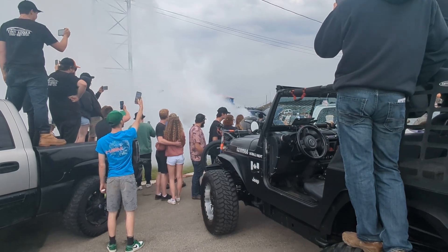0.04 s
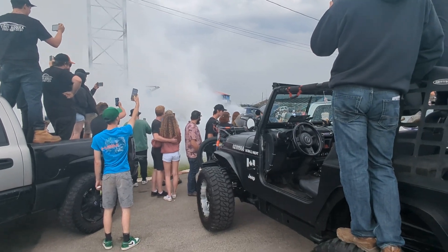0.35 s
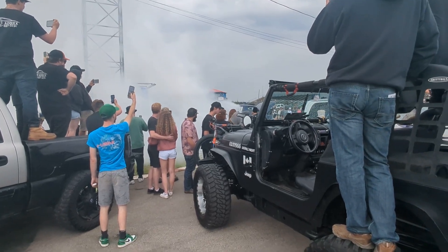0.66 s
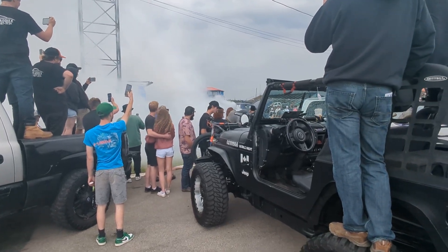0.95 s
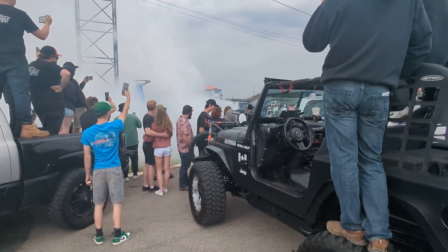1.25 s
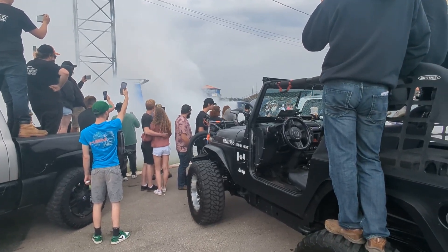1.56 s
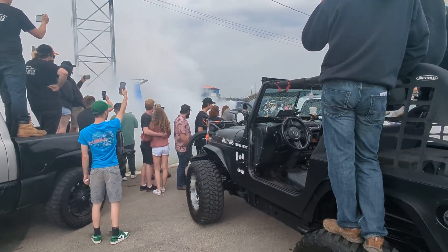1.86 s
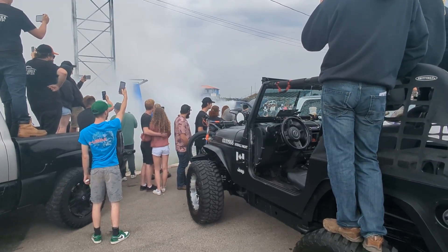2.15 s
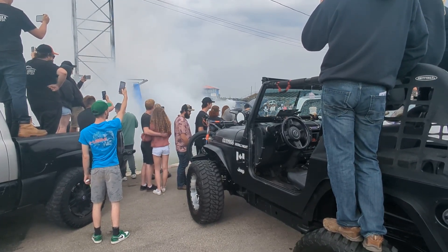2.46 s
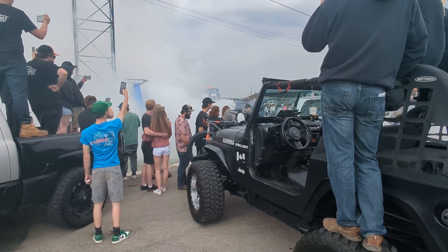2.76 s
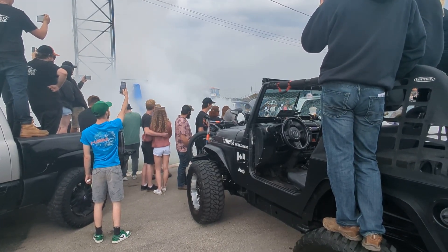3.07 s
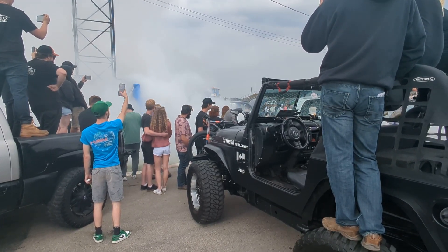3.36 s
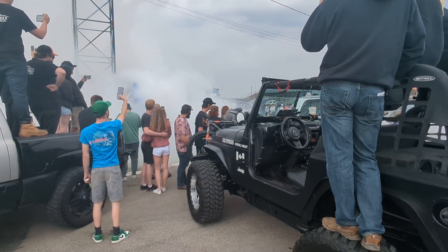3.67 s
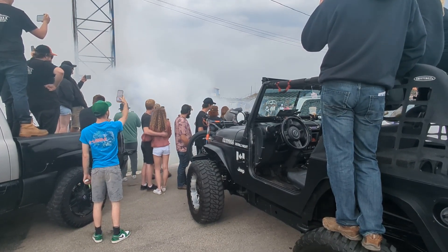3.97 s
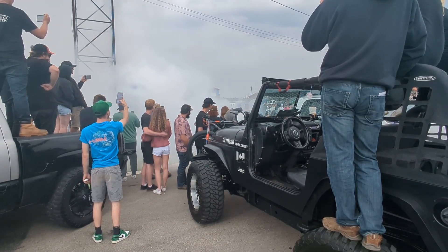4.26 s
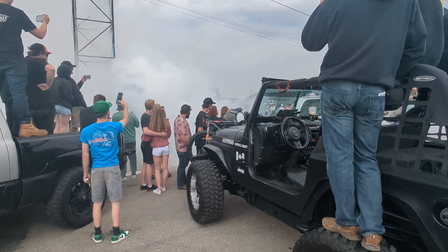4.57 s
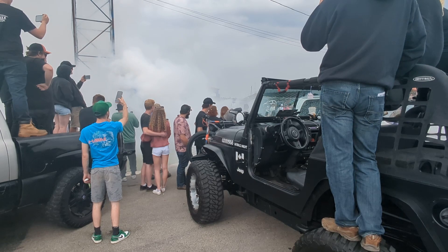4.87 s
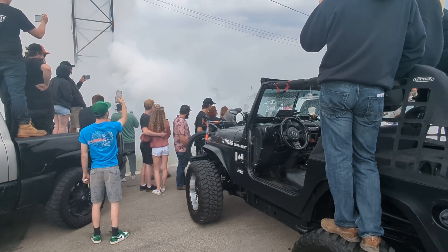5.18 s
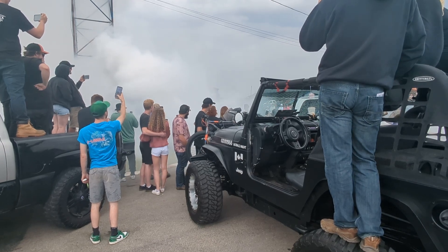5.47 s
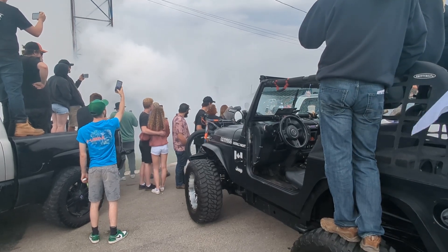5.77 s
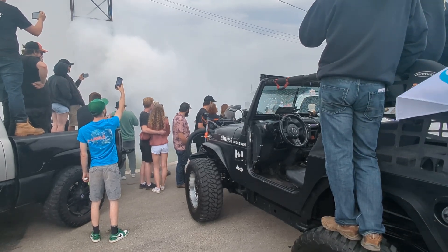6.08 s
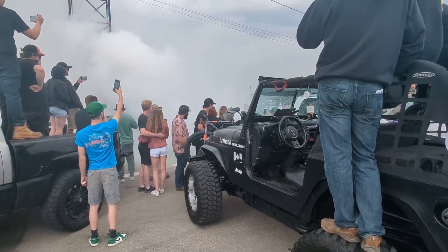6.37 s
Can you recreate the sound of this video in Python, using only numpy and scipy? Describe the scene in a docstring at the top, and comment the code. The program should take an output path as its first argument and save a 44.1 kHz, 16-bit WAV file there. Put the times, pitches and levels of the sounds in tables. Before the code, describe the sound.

A V8 pickup holds a burnout, its engine revving in steady pulses over roaring tyres, with a brief flag snap near the end.

```python
"""Behind a crowd, among parked cars, a V8 pickup holds a burnout near 4200 rpm, the throttle pumped
about twice a second. One cylinder bank dominates the exhaust, so its uneven pulses boom and growl,
and gas rasps at each firing. The spinning tyres roar, spit grit and squeal faintly once.
Late on, a flag rustles, snaps and flutters near the phone, whose right microphone is muffled."""
import sys
import numpy as np
from scipy import signal
from scipy.fft import rfft, irfft, next_fast_len
from scipy.io import wavfile
from scipy.ndimage import uniform_filter1d, minimum_filter1d

SR = 44100
rng = np.random.default_rng(int(sys.argv[2]) if len(sys.argv) > 2 else 0)


def log_audio(samples):
    """Write samples as a 16-bit WAV file to the path given in sys.argv[1]."""
    # one column per channel
    frames = np.atleast_2d(samples).T
    # limit to full scale, then quantise
    limited = np.clip(frames, -1, 1)
    pcm = np.round(limited * 32767).astype(np.int16)
    wavfile.write(sys.argv[1], SR, pcm)


N = 283386
TIME = np.arange(N) / SR

# punch of each cylinder at the nearer tailpipe, in firing order: (level [dB])
CYLINDERS = [0, -10, -10, -2, -10, -2, 0, -10]


def undb(db):
    """Decibels to gain."""
    return 10 ** (np.asarray(db) / 20)


def curve(points, at=TIME):
    """Read a breakpoint curve, by default along the timeline."""
    return np.interp(at, *np.transpose(points))


def colour(x, spectrum):
    """EQ by an outline of (frequency [Hz], gain [dB])."""
    size = next_fast_len(N + 4096)
    f = np.maximum(np.fft.rfftfreq(size, 1 / SR), 1)
    hz, db = np.transpose(spectrum)
    gain = undb(np.interp(np.log(f), np.log(hz), db))
    return irfft(rfft(x, size) * gain, size)[..., :N]


def band(x, spectrum):
    """EQ with steep skirts past both ends, scaled to an rms of 1."""
    (low, low_db), (high, high_db) = spectrum[0], spectrum[-1]
    shaped = colour(x, [(low / 2, low_db - 40), *spectrum, (high * 2, high_db - 40)])
    return shaped / np.sqrt(np.mean(shaped ** 2))


def walk(rate):
    """Smooth random drift with a spread near 1, changing rate times a second."""
    steps = signal.resample(rng.standard_normal(4096), 4 * 4096)
    return np.interp(TIME * rate * 4, np.arange(len(steps)), steps)


def ease(x, seconds):
    """Round the corners of a control."""
    return uniform_filter1d(x, size=max(1, int(seconds * SR)), mode="nearest")


def throttle(open_s=0.099, close_s=0.15, foot_s=0.024, crank_lag_s=0.044, flywheel_s=0.04):
    """Each pump opens, holds and shuts the throttle; the revs climb and sag, late and smoothly."""
    # pedal pumps: (press [s], lift [s], four-stroke cycle rate at press [Hz], at lift [Hz],
    # boom dip before the press [dB], extra gas [dB])
    pumps = [(-0.059, 0.141, 35.26, 37.16, 3.5, 0.5), (0.424, 0.738, 32.41, 34.82, 13, -0.8),
             (0.907, 1.258, 33.48, 36.02, 7, 1.3), (1.434, 1.716, 34.14, 36.37, 9.0, 1),
             (1.909, 2.208, 35.01, 36.57, 6.5, 0.5), (2.539, 2.836, 32.73, 35.16, 10, -0.5),
             (3.07, 3.391, 31.6, 33.28, 16, -2.5), (3.586, 3.929, 32.2, 34.58, 6.5, 0.2),
             (4.039, 4.359, 34.17, 35.5, 6.5, 0), (4.56, 4.894, 34.01, 35.7, 7.5, -1.1),
             (5.051, 5.358, 34.76, 35.9, 7.5, -1), (5.548, 5.854, 34.1, 35.39, 11.5, -2.2),
             (6.061, 6.283, 34.3, 35.38, 5.1, -3)]
    press, lift, low_hz, high_hz, dip_db, extra_db = np.transpose(pumps)
    ramps = [np.minimum((TIME - on) / open_s, 1 - (TIME - off) / close_s) for on, off in zip(press, lift)]
    shut = 1 - ease(np.clip(np.max(ramps, axis=0), 0, 1), foot_s)
    cycle_hz = np.interp(TIME - crank_lag_s, np.c_[press, lift].ravel(), np.c_[low_hz, high_hz].ravel())
    gas_db = -34 - 8 * shut + np.interp(TIME, (press + lift) / 2, extra_db)
    return ease(cycle_hz, flywheel_s), shut, shut * np.interp(TIME, press, dip_db), gas_db


def engine_tone(cycles, order, spread):
    """One harmonic of the engine cycle, timed by the strong and weak firings; no two cycles burn alike."""
    slots = np.arange(len(CYLINDERS)) / len(CYLINDERS)
    slots[0] += .012  # the front cylinder has the longest header, so its pulse lands late
    pattern = np.sum(undb(CYLINDERS) * np.exp(-2j * np.pi * order * slots))
    pipe_lag = np.arctan((order / 7.5) ** 4)  # the pipe holds back tones near and above its resonance
    phase = 2 * np.pi * order * cycles + np.angle(pattern) - pipe_lag
    return np.sqrt(2) * (1 + spread * walk(14)) * np.cos(phase + spread * walk(14))


def exhaust_levels(cycle_hz, shut, dip_db, cruise_hz=35, ring_lag_s=0.032, stumble_s=0.025):
    """The boom rides the throttle, the growl swells as the engine lugs, the firing tone rings the pipe."""
    # pipe resonance, met as the revs sag: (firing rate [Hz], level [dB])
    pipe_ring = [(252, -16), (263, -12.5), (268, -16), (275, -21.5), (284, -20), (296, -20)]
    # the firing tone ducks on the hardest lifts: (time [s], gain [dB])
    stumbles = [(.355, -8.5), (2.95, -3)]
    over_hz = cycle_hz - cruise_hz
    boom_db = -11 - dip_db + 0.28 * over_hz
    growl_db = -18.5 - 0.71 * dip_db - 1.7 * over_hz
    firing_hz = len(CYLINDERS) * np.interp(TIME - ring_lag_s, TIME, cycle_hz)
    firing_db = curve(pipe_ring, firing_hz) + 0.5 * shut + walk(12)
    stumble_db = sum(db * np.exp(-.5 * ((TIME - s) / stumble_s) ** 2) for s, db in stumbles)
    return boom_db, growl_db, firing_db + stumble_db


def exhaust_note(cycles, cycle_hz, boom_db, growl_db, firing_db, gas_db, flutter_per_order=.012):
    """A cross-plane bank fires unevenly, favouring orders 3, 5 and 8; open throttle adds a high snarl."""
    # order 11 barks through the pipe's resonances: (frequency [Hz], level against the boom [dB])
    bark_peaks = [(345, -24.5), (362, -18.5), (378, -30.5), (392, -24.5), (408, -25)]
    # weaker tones: (order, level against the main tones [dB], share following boom over firing [0-1])
    overtones = [(2, -15, 0.8), (4, -14, 0.99), (6, -9, 0.5), (7, -6.5, 0.46), (9, -22.5, 0), (10, -22, 0),
                 (12, -26.5, 0.4)]
    # ragged tones under load: (order, level against the gas [dB])
    snarl_orders = [(13, -9), (14, -9.5), (15, -4), (16, -9), (17, -3.5), (18, -15.5), (19, -2.5), (20, -9),
                    (21, -4), (22, -4.5), (23, -14), (24, -10.5), (26, -14.5)]
    # level of the snarl as the tailpipe swings toward the phone: (time [s], gain [dB])
    snarl_level = [(0, -1.5), (4.0, -2), (4.8, 2), (6.43, 2)]
    # tailpipe resonances that overtones and snarl glide through: (frequency [Hz], gain [dB])
    tailpipe = [(170, -3.5), (195, -8), (208, -4), (235, 1), (252, -3), (292, 1), (320, -5), (360, 2.5),
                (400, -2), (425, 4), (470, -5.5), (525, 1), (560, -6), (600, 0.5), (640, -3.5)]
    # low noise under the boom: (frequency [Hz], level [dB])
    rumble_eq = [(20, -25), (45, -9.5), (65, -1.5), (110, -0.5), (190, -7.5), (270, -4), (315, -11.5),
                 (450, -19)]
    main = sum(undb(db) * engine_tone(cycles, k, k * flutter_per_order)
               for k, db in [(3, boom_db), (5, growl_db), (8, firing_db)])
    bark_db = boom_db + curve(bark_peaks, 11 * cycle_hz)
    bark = undb(bark_db) * engine_tone(cycles, 11, 11 * flutter_per_order)
    weak = sum(undb(db + share * boom_db + (1 - share) * firing_db) * engine_tone(cycles, k, spread=.22)
               for k, db, share in overtones)
    snarl = sum(undb(db) * engine_tone(cycles, k, spread=.3) for k, db in snarl_orders)
    snarl *= undb(gas_db + curve(snarl_level))
    rumble = undb(boom_db / 2 - 20) * band(rng.standard_normal(N), rumble_eq)
    return main + bark + colour(weak + snarl, tailpipe) + rumble


def exhaust_rasp(cycles, gas_db, scatter_db=1.8, decay_firings=0.53, puff_db=5.5, unevenness=0.093):
    """Each firing lets out a puff of turbulent gas."""
    # throaty rush of the gas: (frequency [Hz], level [dB])
    gas_eq = [(300, -23), (470, -6), (530, 1), (600, 2.5), (680, -0.5), (800, 0), (900, -7.5), (1000, -0.5),
              (1200, -6), (1600, -9), (2200, -14), (4000, -22)]
    firing, age = np.divmod(len(CYLINDERS) * cycles, 1)
    firing = firing.astype(int)
    size_db = unevenness * np.take(CYLINDERS, firing, mode="wrap")
    size_db += scatter_db * rng.standard_normal(N)[firing]
    puffs = rng.standard_normal(N) * undb(size_db) * (.5 + np.exp(-age / decay_firings))
    return undb(gas_db + puff_db) * band(puffs, gas_eq)


def tyres(gas_db, tear_db=0.4, flicker_db=0.5, grain_db=4.0, surge=0.2, grit_share=.5):
    """Rubber tears over the asphalt; more throttle and more wheelspin throw more fine grit."""
    # wheelspin roar, before the throttle's surge: (time [s], level [dB])
    wheelspin = [(0.0, -30), (0.48, -32), (0.7, -30), (0.86, -33), (1.25, -32), (2.18, -32.5),
                 (2.52, -35.5), (2.68, -34), (3.05, -33.5), (3.3, -31.5), (4.31, -33), (4.47, -35.5),
                 (4.9, -31.5), (5.01, -35), (5.33, -33), (6.43, -32)]
    # broad roar of the rubber: (frequency [Hz], level [dB])
    roar_eq = [(400, 7), (900, 2.5), (1300, 5), (1620, 3), (2000, 0.5), (2550, 0), (2850, -1), (3450, 0),
               (3650, 1), (3900, -2), (4400, -6), (4750, -9.5), (5000, -12.5), (5320, -10), (5900, -19.5),
               (6400, -17), (7200, -30.5), (12000, -40.5)]
    # sizzle of the grit: (frequency [Hz], level [dB])
    grit_eq = [(3000, -10), (5500, -1), (7200, -2.5), (8300, 2), (9000, -3.5), (9900, -13.5),
               (12000, -11.5), (15500, -23)]
    spin_db = curve(wheelspin)
    tearing = rng.standard_normal(N) * undb(tear_db * walk(400) + flicker_db * walk(25))
    grains = rng.standard_normal(N) * undb(grain_db * np.minimum(rng.exponential(size=N), 4) + walk(120))
    roar_db = spin_db + surge * (gas_db - gas_db.mean())
    grit_db = gas_db + grit_share * (spin_db - spin_db.mean()) - 18.5
    return undb(roar_db) * band(tearing, roar_eq) + undb(grit_db) * band(grains, grit_eq)


def parked_cars(x, left_wet=0.24, right_wet=2.9, decay_s=.05):
    """Ground and bodywork scatter the treble; the shaded right microphone hears more of the echo."""
    echoes = rng.standard_normal((2, 12000)) * np.exp(-TIME[:12000] / decay_s)
    echoes /= np.linalg.norm(echoes, axis=1, keepdims=True)
    scattered = signal.fftconvolve(x[None], echoes, axes=1)[:, :N]
    wet = np.array([[left_wet], [right_wet]])
    return (x + wet * colour(scattered, [(400, -0.5), (1200, 2.5)])) / np.hypot(1, wet)


def squeal(hz=1247, waver=.009):
    """The tread briefly sticks and slips where the engine bogs down."""
    # one faint swell: (time [s], level [dB])
    swell = [(3.05, -84), (3.15, -45), (3.28, -34), (3.45, -40), (3.7, -41), (4.0, -86)]
    phase = 2 * np.pi * np.cumsum(hz * (1 + waver * walk(60))) / SR
    return undb(curve(swell) + 4 * walk(30)) * np.sin(phase)


def cloth_bursts(events, spectrum):
    """Whipping cloth gives off short, bell-shaped bursts of noise."""
    swell = sum(undb(db) * np.exp(-.5 * ((TIME - s) / width) ** 2) for s, db, width in events)
    return swell * band(rng.standard_normal(N), spectrum)


def flag():
    """A flag rustles faintly, cracks once and flutters out; each gesture is its own stem."""
    # moves of the cloth: (time [s], level [dB], half-width [s])
    rustles = [(4.33, -54.5, .04), (4.385, -49, 0.0016), (5.828, -52.5, 0.0038), (6.051, -51, 0.0011),
               (6.081, -47.5, 0.013)]
    snaps = [(6.0565, -16, 0.00045)]
    flutters = [(6.12, -36, 0.028), (6.25, -36.5, .06)]
    # airy rustle, hard snap and papery flutter: (frequency [Hz], level [dB])
    rustle_eq = [(1500, -2.5), (4000, 10), (8000, 3), (12500, -0.5), (15500, -8)]
    snap_eq = [(500, -6), (1100, 4), (2500, -5), (5000, -11.5), (12000, -32)]
    flutter_eq = [(2000, 1.5), (4000, 2.5), (6500, -13.5), (7600, -32)]
    snap = cloth_bursts(snaps, snap_eq)
    flutter = cloth_bursts(flutters, flutter_eq)
    return cloth_bursts(rustles, rustle_eq), snap, flutter


def scene(right_lag_s=0.00049):
    """All reaches the right microphone late and dulled, except the rustles, which are close to both."""
    # muffling of the right microphone against the left: (frequency [Hz], gain [dB])
    right_eq = [(100, 0.5), (270, -0.33), (420, -2), (690, -9), (1120, -19.5), (1820, -16.5), (2400, -19),
                (3100, -30), (5000, -25.5), (8300, -22.5), (12000, -10.5)]
    cycle_hz, shut, dip_db, gas_db = throttle()
    cycles = np.cumsum(cycle_hz) / SR + .0015 * walk(30)
    note = exhaust_note(cycles, cycle_hz, *exhaust_levels(cycle_hz, shut, dip_db), gas_db)
    rush = parked_cars(exhaust_rasp(cycles, gas_db) + tyres(gas_db))
    truck = note + rush + squeal()
    rustle, snap, flutter = flag()
    left, right = truck + snap + flutter
    right = colour(np.interp(TIME - right_lag_s, TIME, right), right_eq)
    return np.array([left, right]) + rustle


def record(dry, notch_hz=4090, skirt_hz=110, notch_db=-10, ceiling=.9, top_hz=15700):
    """The phone has a narrow dip in the treble, eases down the loudest peaks and cuts the top."""
    dipped = colour(dry, [(notch_hz - skirt_hz, 0), (notch_hz, notch_db), (notch_hz + skirt_hz, 0)])
    needed_gain = np.minimum(1, ceiling / (np.abs(dipped).max(axis=0) + 1e-9))
    gain = uniform_filter1d(minimum_filter1d(needed_gain, size=900), size=900)
    return signal.sosfilt(signal.ellip(8, .2, 70, top_hz, fs=SR, output="sos"), gain * dipped)


dry = scene()
out = record(dry)
log_audio(out)
```